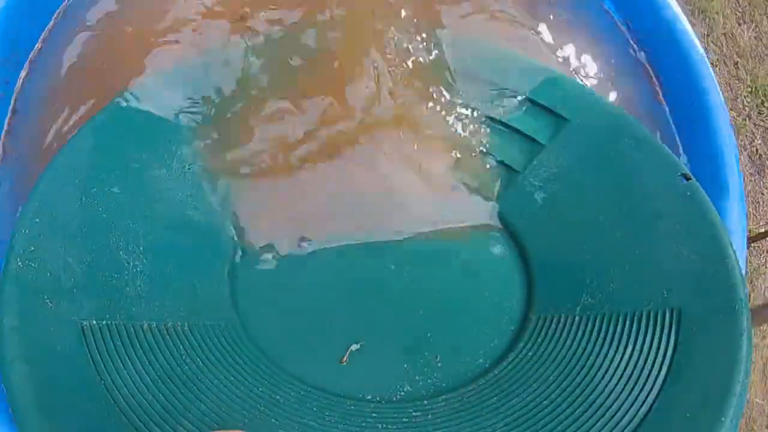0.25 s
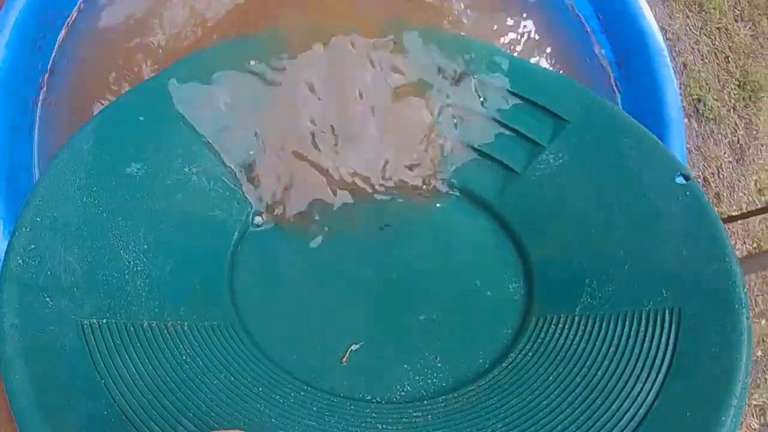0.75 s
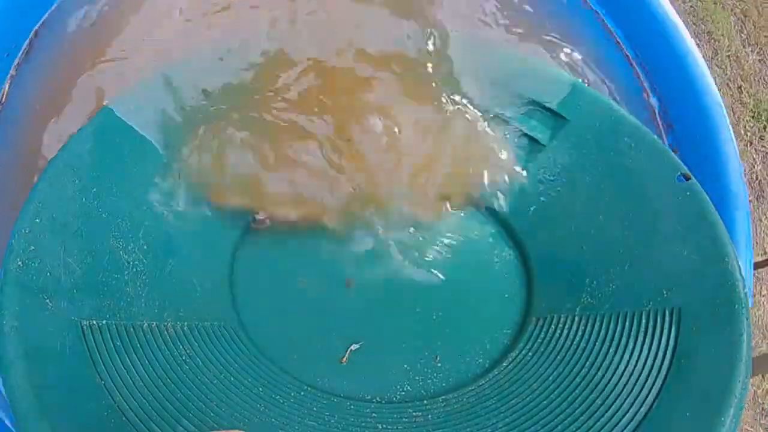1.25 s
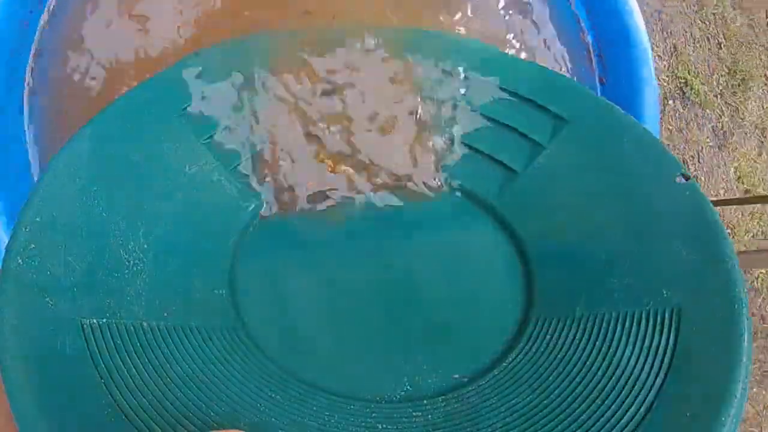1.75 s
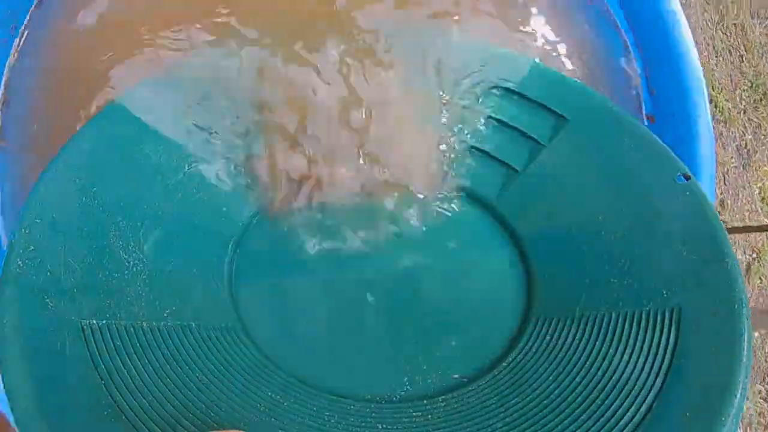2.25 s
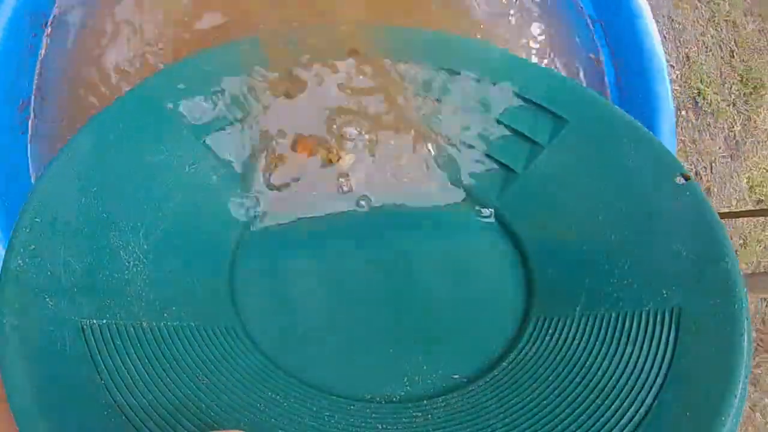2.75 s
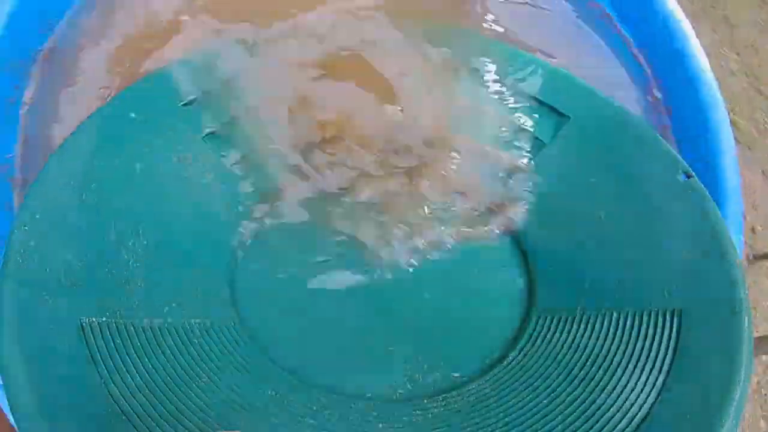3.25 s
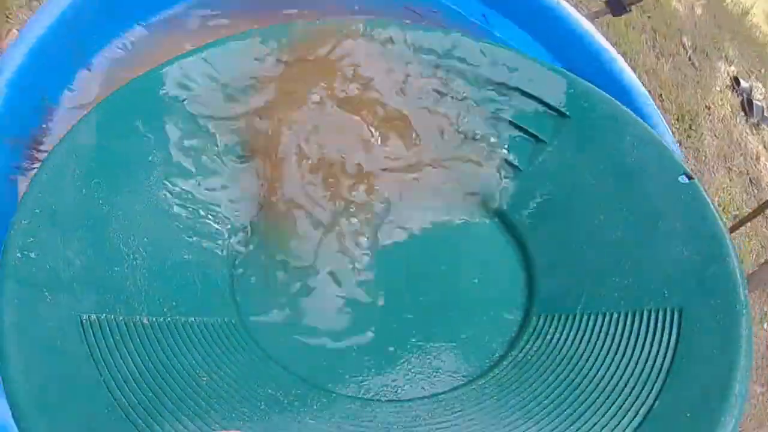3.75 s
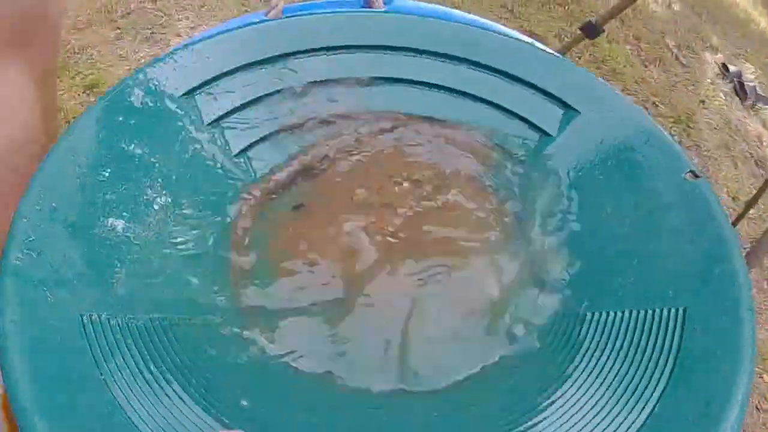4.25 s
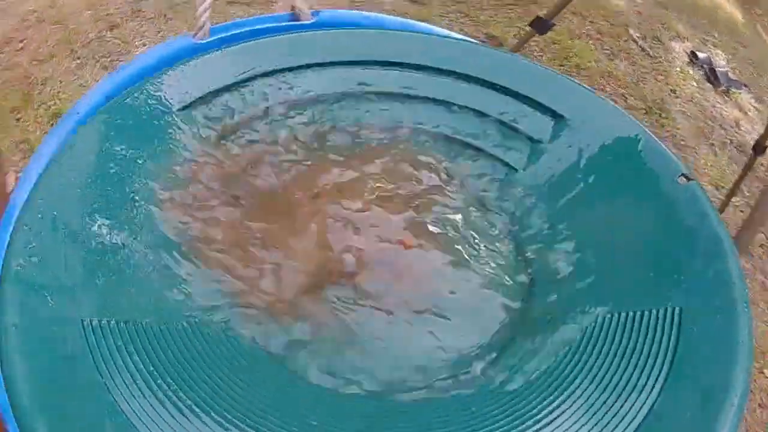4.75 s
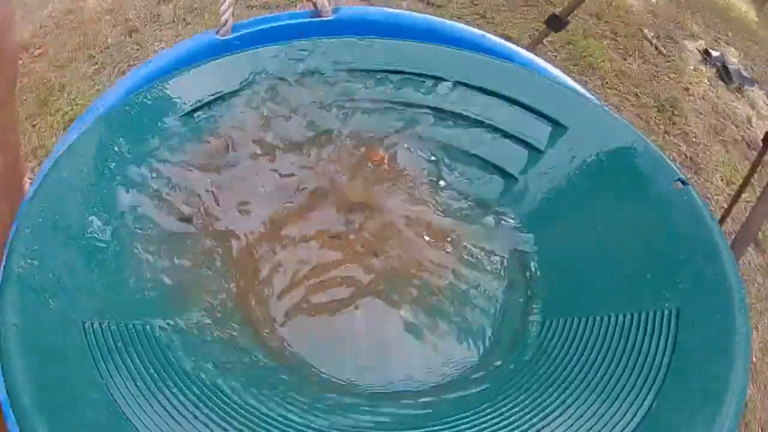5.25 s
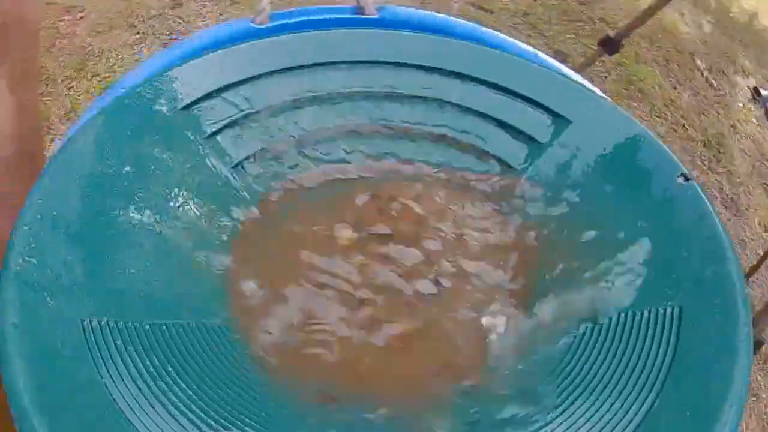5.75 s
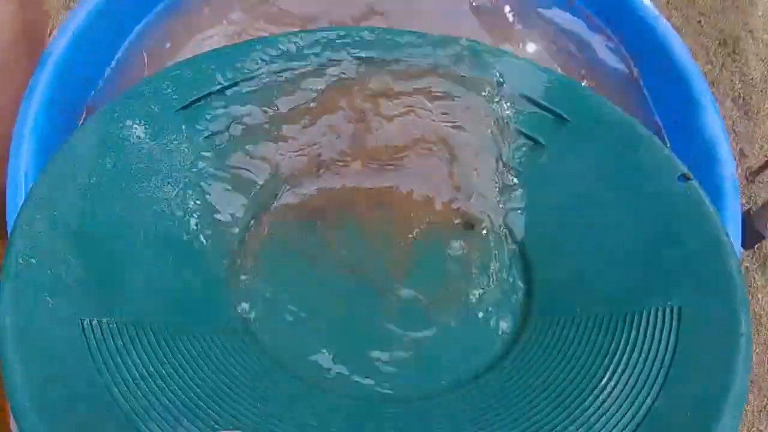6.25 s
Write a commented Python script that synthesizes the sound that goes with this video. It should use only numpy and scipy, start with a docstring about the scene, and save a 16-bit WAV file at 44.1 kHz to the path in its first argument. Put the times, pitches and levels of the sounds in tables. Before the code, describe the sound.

Gravelly water slaps and knocks dully in a plastic pan, sparse dips with bubbly blips first, then a hard, dense, rattling swirl.

```python
"""Washing gravel in a plastic pan

Sand and gravel are washed in a pan that is dipped in a tub three times, then swirled hard.
The microphone sits in a sealed housing fixed to the pan. Slaps, pebbles and grains are therefore heard as
dull knocks and blips: noise pushes convolved with the decaying modes of the plastic. Bumps ring the tub,
air pockets sound as decaying sines of rising pitch, and filtered noise gives low rumble and faint hiss."""
import sys
import numpy as np
from scipy import signal
from scipy.fft import rfft, irfft
from scipy.io import wavfile
from scipy.ndimage import uniform_filter1d

SR = 44100
rng = np.random.default_rng(int(sys.argv[2]) if len(sys.argv) > 2 else 0)


def invert_db(x):
    """Field ratio 10**(x/20) for x, a level in decibels (scalar or array-like)."""
    u = np.asarray(x, float) / 20
    return 10 ** u


def store_pcm(level_fs):
    """Save levels as 16-bit WAV."""
    pcm = np.round(np.clip(level_fs, -1, 1) * 32767).astype(np.int16)
    wavfile.write(sys.argv[1], SR, np.atleast_2d(pcm).T)


N = 286076  # samples

# Modes of pan and housing. Each row: frequency in Hz, width in Hz, relative strength in dB.
PAN_MODES = [(287, 14, -31.5), (419.26, 28.6, 4), (480, 83.15, -3.5), (567.3, 20.4, -7.5), (700, 49.4, -3),
             (830, 24.86, 4.5), (900, 76, -6.5), (1035.7, 51.9, 1), (1109.2, 145.3, -6), (1259, 100, -6.5),
             (1400, 69.9, 3), (1540.1, 78, 2.5), (1648.6, 66.1, -1), (1820.8, 380, -15), (2154.4, 107, -10),
             (2340.2, 144, -14.5), (2750, 110, -17.5), (3170.3, 125.8, -16), (3480.4, 366, -22),
             (3975.5, 110, -25.5), (4200.4, 470, -36), (5130, 400, -35), (5533, 500, -44),
             (6269, 200, -46.5), (6676, 210, -57), (7290, 690, -57.5)]
# Edges in Hz between the regions of the pan: whole bowl | floor | wall | riffles | lip.
PAN_EDGES_HZ = (620, 1200, 1800, 4200)
# Slaps and pebble knocks that stand out. Each row: time heard in seconds, nominal peak in dB,
# then the rms over 10 ms of bowl, floor and riffles in dB against that peak.
KNOCKS = [(.0005, -12, -15.5, -8.5, -20.5), (0.106, -43, -12, -12, -11), (0.231, -35.5, -12.5, -10.5, -25),
          (0.252, -29.5, -14.5, -13.5, -36.5), (0.274, -21, -13, -8, -26.5),
          (0.313, -24.5, -17.5, -16, -30), (0.324, -31.5, -13.5, -12.5, -15),
          (0.362, -31.5, -15.5, -11, -29.5), (0.398, -31, -18.5, -7.5, -25), (0.448, -23, -20, -13, -26),
          (0.469, -19.5, -28, -14.5, -19), (0.513, -27, -14.5, 0.5, -18.5), (0.522, -7, -28, -18, -22),
          (0.564, -31, -19, -13, -18.5), (0.584, -27, -19, -8.5, -14.5), (0.603, -33.5, -15, -11.5, -10.5),
          (0.633, -29.5, -8, -8, -18.5), (0.665, -21, -16, -9.5, -19), (0.673, -14, -24.5, -16.5, -17),
          (0.701, -31, -15, -8.5, -16.5), (0.711, -26.5, -19.5, -8.5, -19.5),
          (0.743, -33.5, -13.5, -11, -15.5), (0.752, -27.5, -16, -12.5, -16),
          (0.771, -20.5, -20.5, -14.5, -21.5), (0.784, -22, -23.5, -12.5, -22.5),
          (0.804, -31.5, -27, -17, -29), (0.837, -34.5, -12.5, -8.5, -16.5), (0.858, -31.5, -7, -14.5, -20),
          (0.92, -36, -15, -16.5, -20), (0.987, -41, -23, -18.5, -21), (1.095, -29, -11, -15, -19.5),
          (1.152, -23, -14, -21.5, -21.5), (1.201, -28.5, -19, -14, -16), (1.259, -19.5, -19.5, -9, -17),
          (1.292, -27, -20, -11, -19), (1.321, -36.5, -21, -19, -8), (1.353, -32.5, -13.5, -15, -16),
          (1.386, -23, -23.5, -13, -17.5), (1.409, -26.5, -10.5, -9.5, -17.5),
          (1.438, -28, -22.5, -10, -26.5), (1.519, -32.5, -13, -10.5, -29.5),
          (1.567, -35.5, -15, -13.5, -19.5), (1.614, -14, -19.5, -15, -21), (1.626, -20.5, -23.5, -19, -18),
          (1.697, -14.5, -19, -14, -26), (1.73, -19, -18, -16, -29), (1.75, -31.5, -6, -13.5, -33.5),
          (1.774, -17, -14.5, -12.5, -31), (1.802, -21.5, -14.5, -14, -21.5),
          (1.83, -26.5, -20, -12, -23.5), (1.885, -40, -10, -13.5, -15), (1.997, -44, -22, -7.5, -29.5),
          (2.015, -26.5, -15, -12, -33.5), (2.045, -9, -14, -13, -19.5), (2.055, -6, -10.5, -11.5, -22),
          (2.066, -7.5, -11.5, -13.5, -22), (2.081, -4.5, -13, -14, -23), (2.092, -4, -10, -14.5, -20),
          (2.111, -16.5, -11.5, -7.5, -19), (2.139, -18, -18, -18, -36.5), (2.164, -19.5, -18, -13, -19.5),
          (2.198, -19.5, -16.5, -9, -17), (2.213, -22.5, -11.5, -5, -19.5), (2.234, -18, -13, -10, -14),
          (2.256, -17, -19, -16, -21.5), (2.285, -19, -12, -14.5, -28), (2.301, -8.5, -20, -26, -22.5),
          (2.325, -17, -30.5, -11, -28), (2.381, -15, -24, -15, -29.5), (2.541, -17.5, -20.5, -15.5, -18.5),
          (2.574, -9.5, -19, -19, -22), (2.615, -27, -10, -4, -10.5), (2.637, -4.5, -24.5, -17.5, -16.5),
          (2.683, -29, -15, -15.5, -19.5), (2.716, -20.5, -20, -16.5, -14), (2.771, -38, -22.5, -20, -10),
          (2.803, -33.5, -24, -26.5, -18), (2.844, -48.5, -17, -18, -18), (2.893, -40, -7, -10.5, -7),
          (2.941, -17.5, -5, -8, -39.5), (3.006, -19, -16.5, -14, -24.5), (3.057, -9, -17, -14.5, -16),
          (3.067, -9, -16, -16.5, -20), (3.084, -11, -19.5, -16, -17), (3.119, -25, -18, -17.5, -16.5),
          (3.164, -23, -20.5, -10.5, -17), (3.183, -16, -10.5, -9.5, -18), (3.232, -13.5, -13.5, -10, -24),
          (3.255, -7.5, -21, -22.5, -35), (3.27, -3, -21, -18.5, -23.5), (3.295, -10, -15.5, -12.5, -14),
          (3.303, -6.5, -17, -18.5, -13.5), (3.319, -9, -16.5, -19, -20.5), (3.406, -16.5, -13, -11.5, -25),
          (3.45, -3, -20, -12.5, -25.5), (3.464, -12, -18, -5.5, -20), (3.482, -4, -21.5, -13.5, -23.5),
          (3.532, -7, -18, -18, -24), (3.564, -9.5, -15.5, -13.5, -21.5), (3.616, -11.5, -11, -11.5, -20.5),
          (3.65, -9, -17.5, -22.5, -24), (3.667, -18.5, -11, -16, -19), (3.794, -21, -15.5, -14.5, -19.5),
          (3.899, -11, -24, -22, -27), (3.929, -13.5, -20, -21.5, -18.5), (4.009, -6.5, -17.5, -13.5, -25),
          (4.068, -14, -20, -16, -18), (4.094, -17, -15, -24, -15), (4.164, -11, -22.5, -19.5, -23.5),
          (4.182, -9, -24, -18.5, -21.5), (4.21, -13, -15, -10.5, -17), (4.248, -5.5, -18.5, -16.5, -21.5),
          (4.31, -13.5, -13.5, -9.5, -17.5), (4.318, -15.5, -14.5, -10.5, -12),
          (4.391, -14.5, -23.5, -20.5, -17.5), (4.422, -9.5, -24.5, -12.5, -26),
          (4.45, -13.5, -13, -8, -7.5), (4.483, -1.5, -15, -15, -15.5), (4.551, -19.5, -17.5, -2.5, -22.5),
          (4.601, -12, -25, -20.5, -20.5), (4.61, -9.5, -26.5, -11.5, -24.5), (4.717, -16, -20, -8, -23),
          (4.753, -11, -17, -8, -15), (4.797, -11, -18, -11.5, -13.5), (4.821, 0.5, -16.5, -13.5, -19.5),
          (4.847, -9, -20.5, -17.5, -20), (4.88, -5.5, -20, -24, -18), (4.944, -10.5, -18, -14, -19.5),
          (4.972, -18, -26.5, -7, -15.5), (4.993, -17, -15, -15.5, -16), (5.07, -3.5, -18, -14.5, -21.5),
          (5.093, -5, -21, -13, -18), (5.109, -11, -10.5, -12, -14.5), (5.115, -3.5, -14.5, -9, -21.5),
          (5.143, -4.5, -18, -12, -23.5), (5.203, -10.5, -18, -14.5, -25.5), (5.255, -20, -26.5, -18, -14),
          (5.3, -14, -30, -8, -23), (5.37, -7, -24, -14, -18.5), (5.383, -9, -16, -10.5, -13),
          (5.425, -9.5, -17, -8, -18.5), (5.446, -1, -18.5, -13.5, -24), (5.487, -8.5, -19.5, -20, -25.5),
          (5.569, -9.5, -22, -13.5, -27), (5.591, -10.5, -17.5, -15.5, -26), (5.626, -2, -25.5, -17, -21.5),
          (5.675, -22.5, -17.5, -4.5, -14.5), (5.706, -17.5, -24, -15, -18),
          (5.759, -11, -25.5, -21, -20.5), (5.812, -11, -14, -7, -14.5), (5.921, -9.5, -19, -15, -21),
          (5.984, -14, -20, -8, -17), (5.995, -7.5, -27, -31.5, -25.5), (6.03, -17, -18.5, -14, -23.5),
          (6.045, -6.5, -23, -11.5, -20.5), (6.059, -19, -20.5, -8, -18), (6.082, -12, -16.5, -8.5, -18),
          (6.118, -11.5, -10.5, -6.5, -20.5), (6.133, -8, -15, -12, -18), (6.174, -7, -16, -15, -25.5),
          (6.185, -8.5, -14.5, -13.5, -20), (6.215, -17.5, -13, -4, -11.5), (6.245, -3, -21, -15.5, -22),
          (6.299, -5, -11.5, -10.5, -25.5), (6.328, -17.5, -18, -16.5, -21), (6.384, -32.5, -28.5, -12, -8),
          (6.458, -34.5, -13, -15.5, -23)]
# Spectrum of the handling rumble. Each row: frequency in Hz, relative level in dB.
RUMBLE_SPECTRUM = [(15, -4), (30, -4.5), (87, 1.5), (160, -5), (230, -6), (400, -16.5), (2000, -92.5)]
# Spectrum of the circuit hiss. Each row: frequency in Hz, relative level in dB.
HISS_SPECTRUM = [(300, -22.5), (3000, 4.5), (7000, 6.5), (10500, -8.5), (13000, 5.5), (15800, 3),
                 (16000, -55)]
# Modes of the water-filled tub. Each row: frequency in Hz, width in Hz, relative strength in dB.
TUB_MODES = [(59, 120, -4), (94.6, 37, 3.5), (161.34, 7, -0.5), (244, 107, -4.5), (288, 110, -3.5)]
# Edge in Hz between the regions of the tub: water mass | side.
TUB_EDGES_HZ = (200,)
# The pan bumps the tub or drops into the water. Each row: start in seconds, rms over 10 ms in dB
# of the water mass and of the side, decay time of the push in ms.
BUMPS = [(.0005, -41, -35.5, 0.74), (.52, -61.5, -48.5, 3.9), (.858, -53.5, -48.5, 3.25),
         (1.262, -51, -58, 5.4), (2.05, -30, -24.5, 3.2), (2.085, -32.5, -23.5, 10), (2.105, -33, -33, 6.7),
         (2.3, -46, -41, 5.1), (2.942, -38, -36.5, 4), (3.07, -45, -36, 7), (3.1, -44, -54, 3.7),
         (3.7, -50, -30.5, 5.8), (4.005, -40, -57, 1.5), (4.22, -47, -46.5, 4.2), (4.825, -43.5, -44.5, 4),
         (4.89, -46, -47.5, 7.3), (5.12, -44, -53.5, 9.6), (5.45, -52, -38, 5.7),
         (6.297, -36.5, -23.5, 2.9)]
# Trapped air pockets. Each row: start in seconds, starting pitch in Hz, level in dB before the
# onset and decay shape it, decay time in ms.
BUBBLES = [(.11, 2394, -36, 3.5), (0.274, 1014, -14.5, 5.6), (.634, 637, -25.5, 7.6),
           (.918, 2060, -27.5, 3.46), (1.099, 2520, -27.5, 2.48), (1.1, 436.4, -32, 11),
           (1.12, 480, -32, 27), (1.162, 454, -29.5, 9.2), (1.186, 3200, -38, 4), (1.204, 830, -31.5, 36),
           (1.26, 2750, -30.5, 7.5), (1.258, 900, -24, 3.6), (1.288, 1029, -21, 6.1),
           (1.438, 1400, -15, 5.15), (1.44, 815.3, -26, 10.2), (1.52, 821.3, -27.5, 12.1),
           (2.015, 1002, -22, 8.9), (2.273, 441.4, -22, 20), (2.344, 2677, -42, 4.4), (2.648, 700, -21, 5),
           (2.682, 1400, -27, 12.9), (2.948, 735, -15, 8.8), (3.057, 1337, -12.5, 14.1),
           (3.069, 2224, -14, 3.9), (6.308, 762.6, -9.5, 7.7), (6.334, 1969, -13.5, 2.47),
           (6.384, 1987, -30, 3.6), (6.444, 2660, -45, 7.3)]
# Droplets that tick on the thin lip. Each row: start in seconds, nominal peak in dB.
TICKS = [(0.5227, -52.5), (1.1957, -48.5), (1.259, -40), (2.056, -40.5), (2.0652, -38), (2.0854, -39),
         (2.0966, -32), (2.2014, -44.5), (2.2353, -34.5), (2.6404, -43), (3.2715, -39), (3.4514, -33),
         (3.4823, -41.5), (4.3197, -40), (4.4702, -33.5), (4.4841, -33.5), (4.6084, -40.5), (4.7975, -35.5),
         (4.8211, -23.5), (5.0554, -40), (5.0714, -29.5), (5.0987, -31.5), (5.1417, -35.5), (5.1916, -38.5),
         (5.3767, -34.5), (5.4524, -30), (5.5218, -39.5), (5.6266, -33), (5.689, -45), (6.1849, -39),
         (6.2457, -31.5), (6.2991, -39)]
# How hard the water carries the grit along. Each row: time in seconds, flow in dB.
FLOW = [(0.0, -55), (0.29, -48.5), (0.42, -43), (0.61, -39), (0.7, -42.5), (0.88, -57), (1.12, -45.5),
        (1.28, -39.5), (1.91, -49), (2.06, -39.5), (2.18, -34.5), (2.2, -38), (2.33, -37.5), (2.56, -33.5),
        (2.73, -45.5), (3.0, -42.5), (3.14, -28.5), (3.36, -23), (3.47, -22.5), (3.87, -24.5),
        (4.12, -22.5), (4.41, -23.5), (4.53, -20), (4.66, -25.5), (4.81, -20.5), (4.95, -23.5), (5.4, -23),
        (5.58, -22.5), (6.01, -21.5), (6.18, -24), (6.32, -33.5), (6.49, -53.5)]
# Grit per region, in the order bowl, floor, wall, riffles, lip: level in dB against a full flow,
GRIT_DB = (-12, -6, -3, -12, -35)
# its growth in dB per dB of flow,
GRIT_SLOPE = (1.022, 1.22, 1.291, 1.242, 0.886)
# and the spread of its slow wander in dB.
GRIT_WANDER_DB = (2, 2, 2.2, 1.433, 0.9)
# Make-up of the grit, one row per region in that order. Each row: weight of the region's own taps,
# of froth, of fine sand, against a weight of 1 for the shared taps.
GRIT_MIXES = ((0.81, 0.45, 0.88), (0.65, 0.3, 1.0), (0.79, 0.485, 0.44), (0.53, 0.44, 0.88), (0.904, 0.13, 0.5))

FULL_FLOW_DB = -24
HISS_DB = -80.5  # rms
HOUSING_HZ = 7900  # upper limit of what the housing passes
BUILD_MS = 1.207  # each knock's push starts this long before its listed time
CREST_DB = 9  # peak of a knock above its rms over 10 ms
RUMBLE_DB, RUMBLE_SLOPE = -56, 0.4  # at full flow; dB per dB of flow
# Push of a knock: decay time in ms at a bowl share of -18 dB, its growth per dB, its log scatter.
PUSH_MS, PUSH_MS_PER_DB, PUSH_SCATTER = 2.994, 0.2272, 0.3


def unit(x):
    """Normalisation: a signal divided by its own rms has rms 1."""
    return x / np.sqrt(np.mean(x ** 2))


def curves(table):
    """Linear interpolation: the columns of a timed table become one value per sample."""
    s, *columns = np.transpose(table)
    t = np.arange(N) / SR
    return np.array([np.interp(t, s, column) for column in columns])


def coloured(points):
    """Spectral shaping: white noise is weighted in frequency by (Hz, dB) points, then set to rms 1."""
    hz, db = np.transpose(points)
    f = np.maximum(np.fft.rfftfreq(N, 1 / SR), 1)
    spectrum = rfft(rng.standard_normal(N))
    return unit(irfft(spectrum * invert_db(np.interp(np.log(f), np.log(hz), db)), N))


def walk(rate):
    """Slow fluctuation: random levels, rate per second, are joined by ramps and given a spread of 1."""
    k = int(SR / rate)
    steps = np.repeat(rng.standard_normal(N // k + 1), k)
    w = uniform_filter1d(steps, k)[:N]
    return w / w.std()


def rings(modes, edges_hz, size, over=0.996, under=0.585):
    """Modal superposition: damped sines sum to each region's impulse response, of energy 1."""
    t = np.arange(size) / SR
    out = np.zeros((len(edges_hz) + 1, len(t)))
    for k, (hz, width, db) in enumerate(modes):
        mode = width * invert_db(db) * np.exp(-np.pi * width * t) * np.sin(2 * np.pi * hz * t)
        # neighbours swing in opposite sense, so their skirts add
        out[np.searchsorted(edges_hz, hz)] += (-1) ** k * mode
    # soft plastic takes no sharp fronts: each region moves only near its own range,
    # the top one up to the housing's limit
    lows = under * np.array([modes[0][0], *edges_hz])
    highs = [*(over * np.array(edges_hz)), HOUSING_HZ]
    for k, band in enumerate(zip(lows, highs)):
        sos = signal.butter(4, band, "bandpass", fs=SR, output="sos")
        out[k] = signal.sosfilt(sos, out[k])
    return out / np.sqrt(np.sum(out ** 2, axis=1, keepdims=True))


def blows(table, ring, rise_ms=0.34, front=2.7, front_ms=0.72):
    """Excitation by convolution: a short ragged, decaying push rings each region at its own strength."""
    out = np.zeros(N + SR)
    t = np.arange(SR // 25) / SR
    rise = 1 - np.exp(-1000 * t / rise_ms)  # water cushions the contact
    hardness = 1 + front * np.exp(-1000 * t / front_ms)  # hardest at first
    ragged = rng.standard_normal((len(table), len(t))) * hardness
    for (s, *region_db, ms), noise in zip(table, ragged):
        push = noise[None] * rise * np.exp(-1000 * t / max(ms, 0.1))
        rung = signal.fftconvolve(push, ring, axes=1)
        # energy of rms 1 over 10 ms
        rung = rung * np.sqrt(SR / 100 / np.sum(rung ** 2, axis=1, keepdims=True))
        i = int(s * SR)
        out[i:i + rung.shape[1]] += invert_db(np.array(region_db)) @ rung
    return out[:N]


def knocks(pan, lip_db=-30, scatter_db=2.0, least=0.17):
    """Energy partition: the wall takes what the other regions leave; the lip follows the riffles."""
    s, peak_db, *share_db = np.transpose(KNOCKS)
    chance = rng.standard_normal((len(s), 2)).T
    rest = 1 - np.sum(invert_db(np.array(share_db) + CREST_DB) ** 2, axis=0)
    wall = peak_db - CREST_DB + 10 * np.log10(np.maximum(rest, least))
    bowl, floor, riffles = peak_db + share_db
    lip = riffles + lip_db + scatter_db * chance[0]
    # a knock that moves the whole bowl pushes longer
    ms = PUSH_MS + PUSH_MS_PER_DB * (share_db[0] + 2 * CREST_DB)
    ms = ms * np.exp(PUSH_SCATTER * chance[1])
    start = np.maximum(s - BUILD_MS / 1000, 0)
    return blows(np.transpose([start, bowl, floor, wall, riffles, lip, ms]), pan)


def bumps(tub):
    """Impact on a filled vessel: each push rings the low modes of water mass and side."""
    return blows(BUMPS, tub)


def carried(db, slope):
    """Transport by flow: the level rises and falls with the flow, slope dB per dB."""
    return invert_db(FULL_FLOW_DB + db + slope * (curves(FLOW)[0] - FULL_FLOW_DB))


def grit(per_s, spread_db, ms):
    """Random impacts: grains tap at chance times, most small, a few large, each a brief noise scrape."""
    hit = rng.random(N) < per_s / SR
    size = hit * invert_db(spread_db * np.minimum(rng.exponential(size=N), 5))
    fade = np.exp(-1000 / SR / ms)
    envelope = signal.lfilter([1], [1, -fade], size)
    return unit(envelope * rng.standard_normal(N))


def froth(per_s=800, spread_db=3, cycles=6, low_hz=400, high_hz=7000):
    """Bubble resonance: countless notes of a few rising cycles; small bubbles are higher and shorter."""
    count = int(per_s * N / SR)
    out = np.zeros(N + SR)
    for when, where, size in rng.random((count, 3)):
        hz = low_hz * (high_hz / low_hz) ** where
        turns = hz * np.arange(int(4 * cycles * SR / hz)) / SR
        envelope = turns * np.exp(-2 * turns / cycles)
        note = np.sin(2 * np.pi * turns * (1 + turns / 600)) * envelope
        level = invert_db(-spread_db * np.log(1 - 0.99 * size)) * hz / high_hz
        i = int(when * N)
        out[i:i + len(note)] += level * note
    return unit(out[:N])


def wash(pan):
    """Superposed random impacts: clumped shared and local taps, froth and the hush of sand ring the pan."""
    shared = grit(per_s=250, spread_db=2.5, ms=1.77) * invert_db(1.1 * walk(25))
    shared = shared + 0.58 * grit(per_s=45, spread_db=4.0, ms=2.2)
    foam = froth()
    rows = []
    for (own, wet, sand), db, slope, wander_db in zip(GRIT_MIXES, GRIT_DB, GRIT_SLOPE, GRIT_WANDER_DB):
        alone = grit(per_s=300, spread_db=2.0, ms=1.3) * invert_db(3.4 * walk(27))
        drift = invert_db(wander_db * walk(6))  # the load wanders over the pan
        mixed = unit(shared + own * alone + wet * foam + sand * rng.standard_normal(N))
        rows.append(mixed * drift * carried(db, slope))
    return signal.fftconvolve(np.array(rows), pan, axes=1)[:, :N].sum(axis=0)


def rumble():
    """Low-frequency shaking: noise from hands and water follows the flow, passing under the resonances."""
    shake_db = RUMBLE_DB + RUMBLE_SLOPE * (curves(FLOW)[0] - FULL_FLOW_DB)
    return coloured(RUMBLE_SPECTRUM) * invert_db(shake_db + 2.0 * walk(30) + 1.2 * walk(4))


def hiss():
    """Circuit noise: a steady random signal of fixed spectrum and level."""
    return invert_db(HISS_DB) * coloured(HISS_SPECTRUM)


def plinks(per_s=35, over_db=5, spread_db=3, cycles=4.23, low_hz=420, high_hz=3200):
    """Random bursts of small air pockets: louder in a strong flow, weaker and shorter at high pitch."""
    when, where, size = rng.random((int(per_s * N / SR), 3)).T
    start = when * N / SR
    hz = low_hz * (high_hz / low_hz) ** where
    s, flow_db = np.transpose(FLOW)
    octaves = np.log2(hz / low_hz)
    db = np.interp(start, s, flow_db) + over_db - spread_db * (np.log(1 - 0.95 * size) + octaves)
    return list(zip(start, hz, db, 1000 * cycles / hz))


def bubbles(rise_ms=0.6, glide=0.022):
    """Resonance of trapped air: each pocket starts quickly and climbs a little in pitch as it dies."""
    out = np.zeros(N + SR)
    t_ms = 1000 * np.arange(SR // 8) / SR
    for s, hz, db, ms in list(BUBBLES) + plinks():
        pitch = hz * (1 + glide * np.minimum(t_ms / ms, 4))
        shape = (1 - np.exp(-t_ms / rise_ms)) * np.exp(-t_ms / ms)
        i = int(s * SR)
        out[i:i + len(t_ms)] += invert_db(db) * shape * np.sin(2 * np.pi * np.cumsum(pitch) / SR)
    return out[:N]


def ticks(pan, ms=2.5, crest_db=13):
    """Local excitation: spray strikes the lip alone, so only the highest modes ring."""
    return blows([(s, db - crest_db, ms) for s, db in TICKS], pan[-1:])


def scene():
    """Linear superposition: knocks, spray, grit and froth ring the same plastic; bumps ring the tub."""
    pan = rings(PAN_MODES, PAN_EDGES_HZ, SR // 12)
    tub = rings(TUB_MODES, TUB_EDGES_HZ, SR // 5)
    mix = knocks(pan) + ticks(pan) + wash(pan) + bubbles() + bumps(tub) + rumble()
    return mix[None]


def roll_off(x):
    """The treble ends steeply here."""
    return signal.sosfilt(signal.butter(12, 15830, fs=SR, output="sos"), x)


def record(dry):
    """Saturation: the input stage bends the loudest peaks towards a ceiling, and it also hisses."""
    ceiling, knee = 0.87, 16  # full scale is 1; a higher knee bends later and more sharply
    bent = dry / (1 + np.abs(dry / ceiling) ** knee) ** (1 / knee)
    return roll_off(bent + hiss())


dry = scene()
out = record(dry)
store_pcm(out)
```